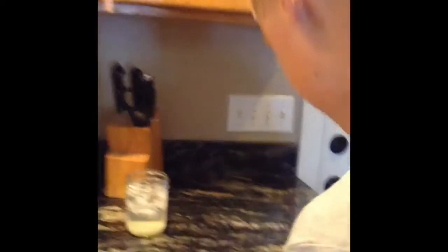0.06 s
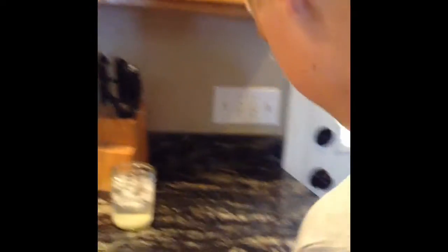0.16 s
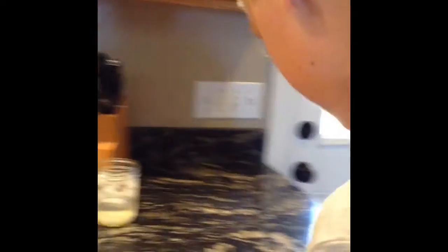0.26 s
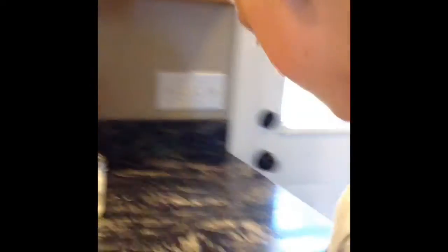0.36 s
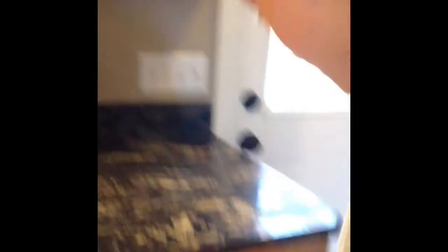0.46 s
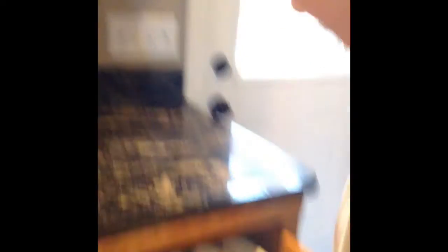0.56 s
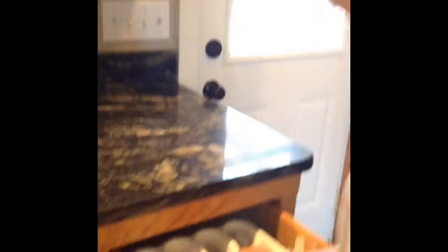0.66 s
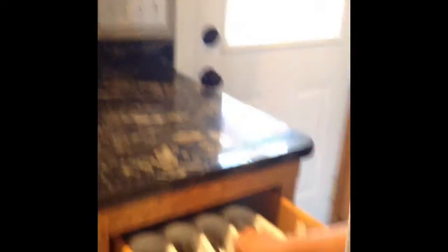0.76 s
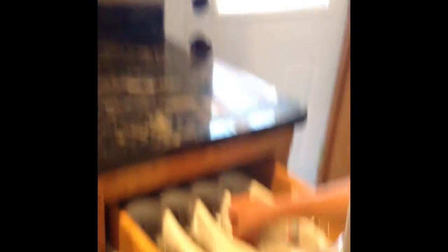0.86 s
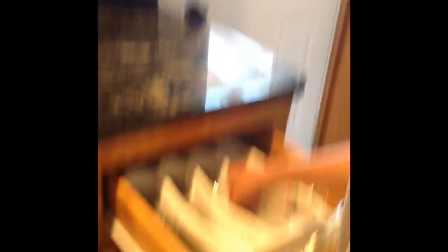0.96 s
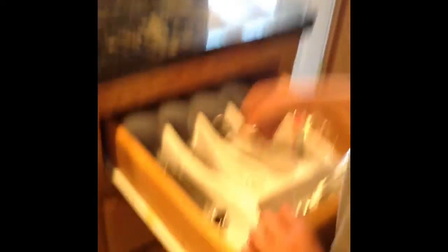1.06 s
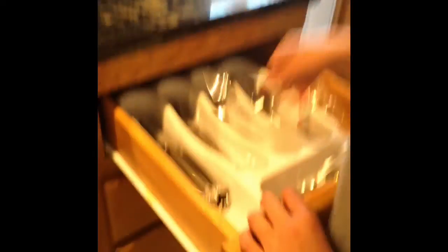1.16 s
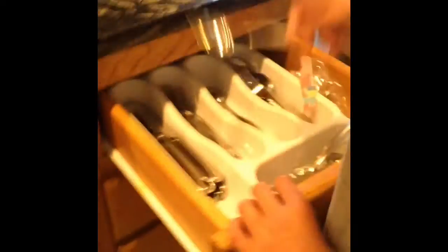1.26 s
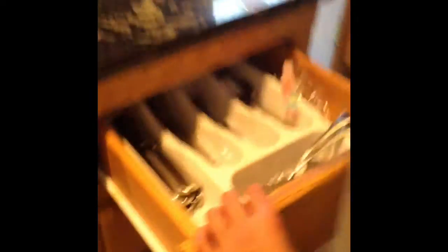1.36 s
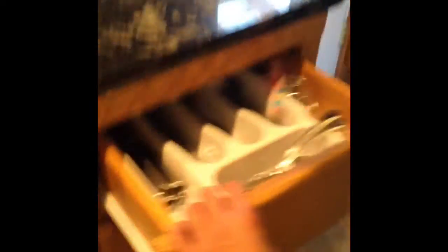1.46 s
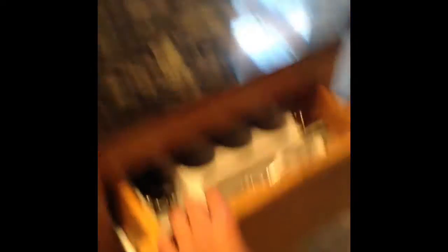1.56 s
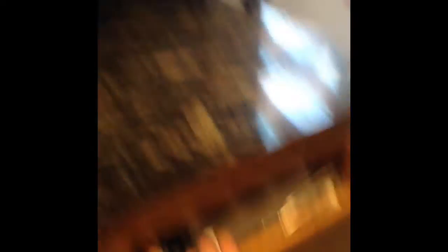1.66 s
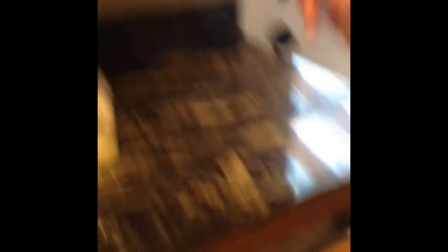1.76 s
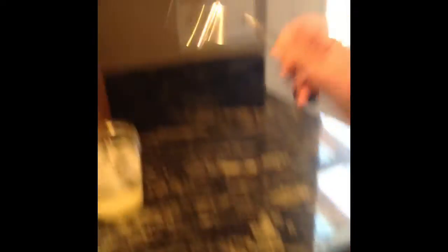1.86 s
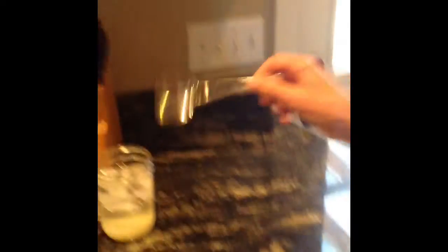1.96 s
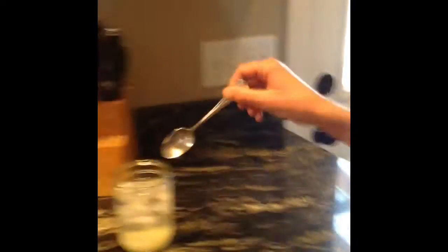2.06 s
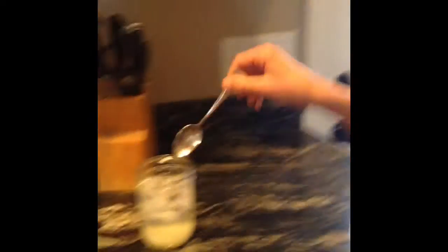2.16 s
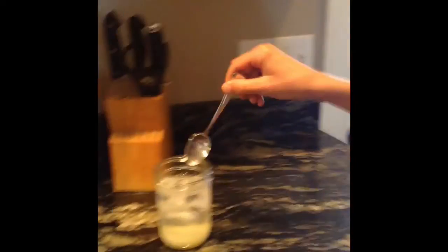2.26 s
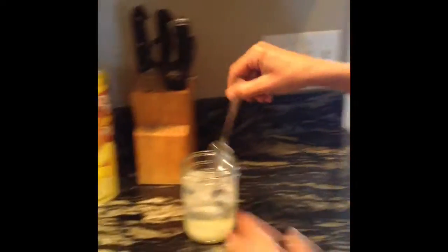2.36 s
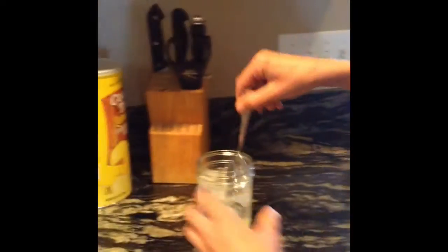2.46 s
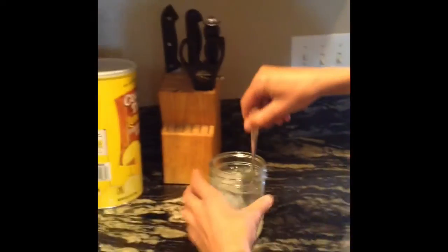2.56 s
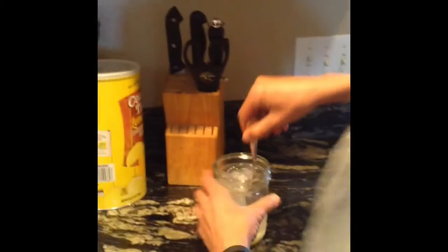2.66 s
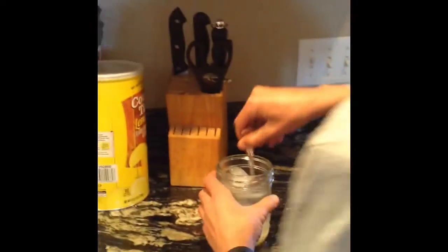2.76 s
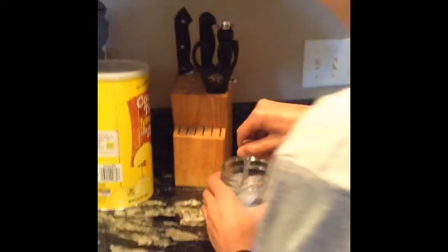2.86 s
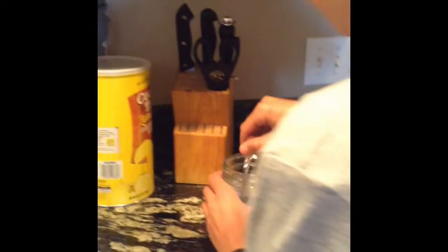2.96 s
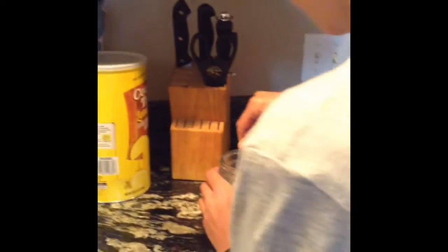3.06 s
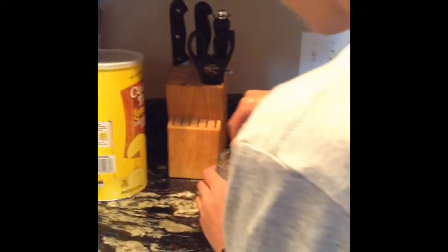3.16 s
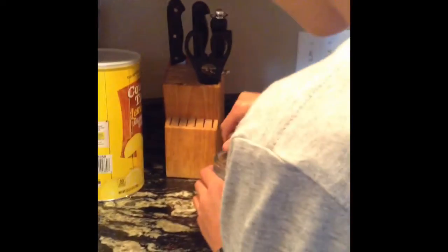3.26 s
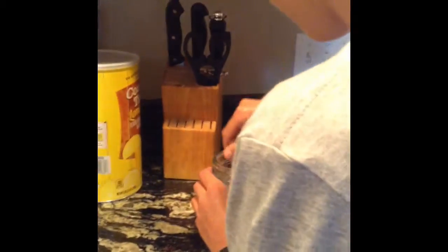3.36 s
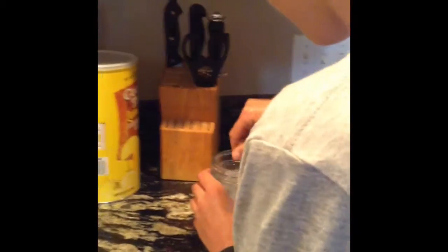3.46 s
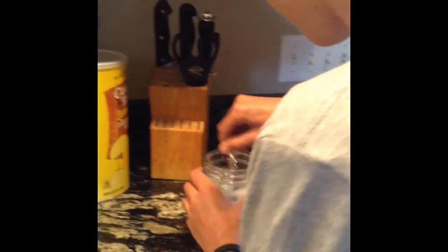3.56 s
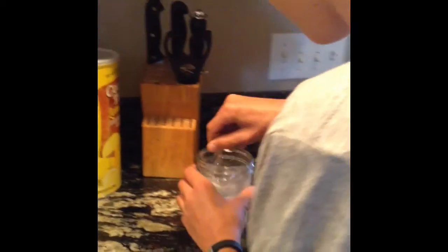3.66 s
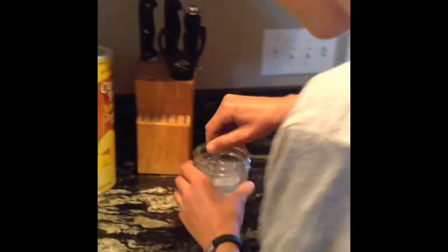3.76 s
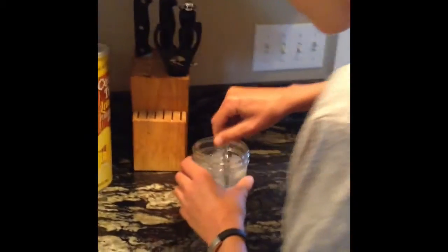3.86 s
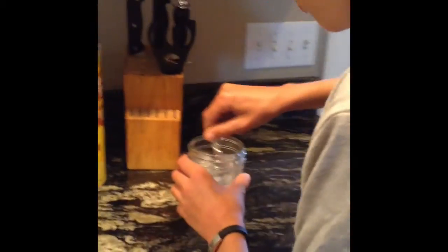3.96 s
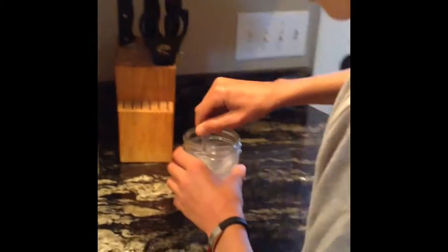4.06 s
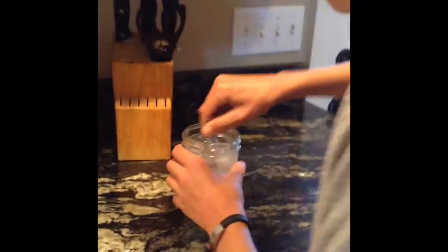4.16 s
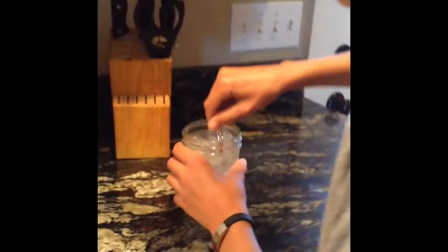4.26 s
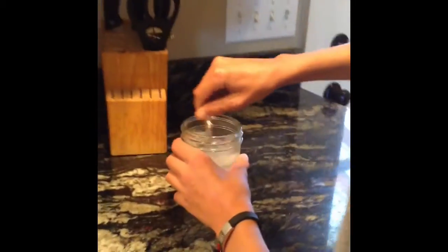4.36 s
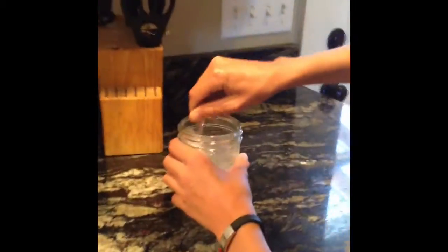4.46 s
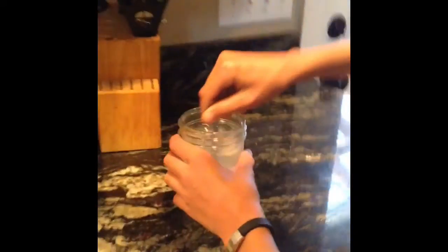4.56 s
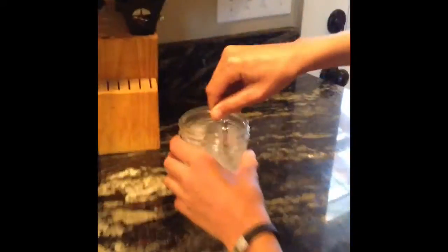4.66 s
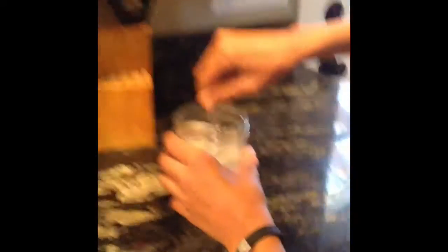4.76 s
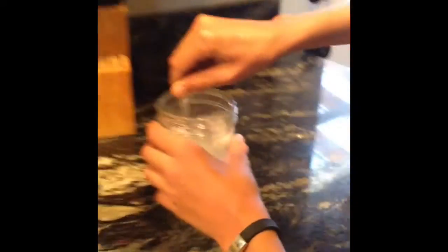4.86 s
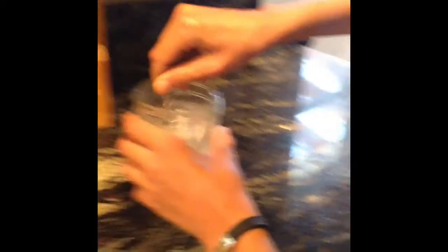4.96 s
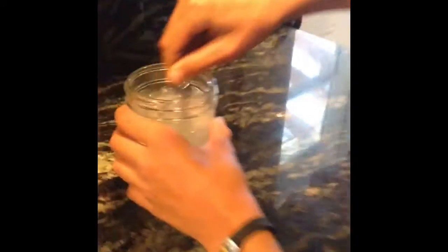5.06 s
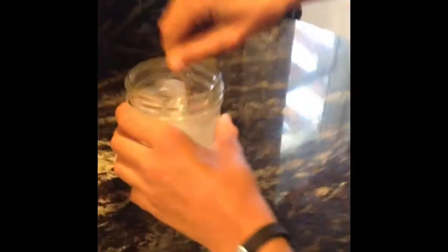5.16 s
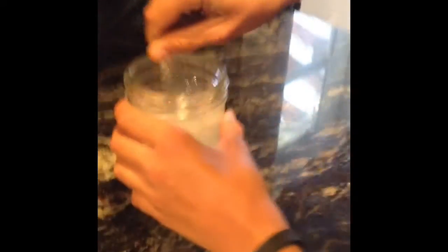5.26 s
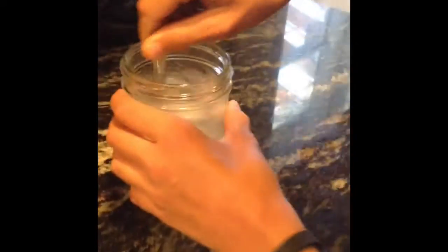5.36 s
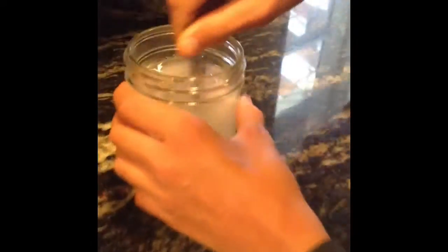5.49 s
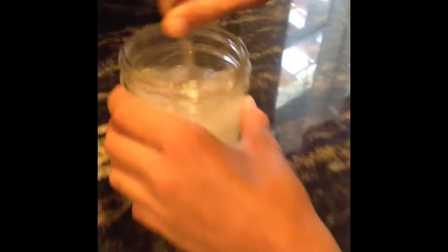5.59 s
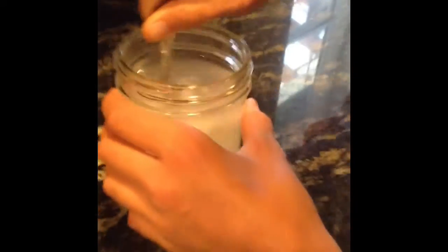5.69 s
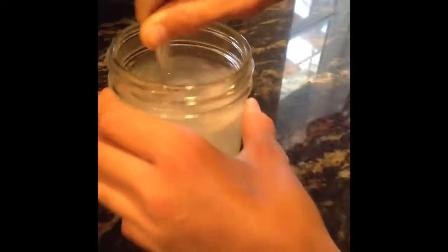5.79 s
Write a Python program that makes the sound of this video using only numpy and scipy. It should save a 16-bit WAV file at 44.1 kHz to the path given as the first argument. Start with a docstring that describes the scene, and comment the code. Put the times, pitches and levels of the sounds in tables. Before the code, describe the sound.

Close phone pickup in a reflective kitchen: brief drawer rolling, metallic tray rattle peaking in a hard ringing clack, a scraping roll back and a woody double-thud. After a short gap, a sharp ice crack begins the stirring: irregular glass ticks, crunchy ice chips, swishing water and tiny bubble gulps, getting drier, closer and busier towards the end.

```python
"""A spoon stirs a glass jar of ice water: struck wall modes clink, cubes grind, noise and bubbles slosh.
Before that a cutlery drawer rumbles open, the spoon is picked from the rattling tray and the drawer bangs shut:
coloured noise for the rolling, bursts of micro-impacts and decaying modes for the blows.
A phone close by hears it with the decaying noise tail of the small, hard kitchen."""
import sys
import numpy as np
from scipy import signal
from scipy.fft import rfft, irfft
from scipy.io import wavfile
from scipy.ndimage import uniform_filter1d

SR = 44100
rng = np.random.default_rng(int(sys.argv[2]) if len(sys.argv) > 2 else 0)


def store_wav(level_fs):
    """Save 16-bit WAV to argv[1]."""
    pcm = np.round(np.clip(np.atleast_2d(level_fs), -1, 1) * 32767)
    wavfile.write(sys.argv[1], SR, pcm.T.astype(np.int16))


N = 256970
T = np.arange(N) / SR
HIT_T = T[:SR // 2]

# blows on drawer and cabinet: (time [s], tray clack [dB], tray ring [dB], cabinet thud [dB],
# cutlery relative level [dB], clack decay [s])
KNOCKS = [(.303, -36.5, -54, -57, -41.5, 0.0086), (0.668, -35.5, -54, -59, -28, 0.027),
          (0.72, -38, -31.5, -39.5, -53, 0.011), (0.858, -34, -44, -42, -33.5, 0.015),
          (0.918, -26.5, -35, -32.5, -31.5, 0.048), (0.954, -31.5, -36, -46, -35.5, 0.038),
          (1.117, -22, -36, -37, -17.5, 0.018), (1.181, -7, -10.5, -35, -13, 0.0026),
          (1.192, -21, -22, -22.5, -23, 0.011), (1.2, -25, -30, -46, -21, 0.037),
          (1.558, -27.5, -44, -52, -32.5, 0.0061), (2.046, -14, -25, -15.5, -44, 0.0046),
          (2.0535, -30, -47, -18.5, -41, .008), (2.0609, -30, -29, -15.5, -27.5, 0.064),
          (2.069, -23.5, -45, -21, -28, 0.013), (2.408, -39, -57, -43, -48, 0.1)]
# cubes knock dully on the jar wall: (time [s], relative level [dB])
NUDGES = [(2.59, -34), (3.3604, -39.5), (3.6101, -36.5), (3.7944, -32), (3.65, -40.5), (3.901, -41),
          (4.0115, -37), (4.0496, -34.5), (4.2377, -43), (4.313, -34), (4.446, -43), (4.6344, -47),
          (4.82, -44), (5.0307, -35), (5.0666, -33), (5.0926, -34), (5.38, -34), (5.48, -31), (5.557, -37),
          (5.567, -31), (5.577, -39), (5.7108, -43)]
PIECE_SPREAD = 0.1  # cutlery pieces and cubes ring up to this share below nominal pitch


def undb(db):
    """Decibels to amplitude."""
    return 10 ** (np.asarray(db) / 20)


def unit(x):
    """Scale to rms 1."""
    return x / np.sqrt(np.mean(x ** 2) + 1e-20)


def crest(x, size=176):
    """Scale so that the loudest 4 ms have rms 1."""
    return x / np.sqrt(uniform_filter1d(x ** 2, size).max() + 1e-20)


def curves(rows):
    """Level columns as smoothed gains over time, near silence outside their span."""
    time_s, *columns = np.transpose(rows)
    levels_db = [np.interp(T, time_s, column, left=-120, right=-120) for column in columns]
    return [uniform_filter1d(undb(db), size=441) for db in levels_db]


def add(track, time_s, sound):
    """Mix a sound into the track at time_s."""
    i = max(int(time_s * SR), 0)
    track[i:i + len(sound)] += sound[:N - i]


def colour(x, points, size=4096):
    """Minimum-phase filter through (frequency [Hz], level [dB]) points."""
    hz, db = np.transpose(points)
    f = np.maximum(np.fft.rfftfreq(size, 1 / SR), 1)
    gain = undb(np.interp(np.log(f), np.log(hz), db))
    # fold the cepstrum to make the filter causal
    cepstrum = irfft(np.log(gain))
    cepstrum[1:size // 2] *= 2
    cepstrum[size // 2 + 1:] = 0
    impulse = irfft(np.exp(rfft(cepstrum)))
    return signal.fftconvolve(x, impulse)[:len(x)]


def wander(per_s):
    """Random curve with about per_s turns a second and a spread near 1."""
    return np.interp(T * per_s, np.arange(len(HIT_T)), rng.standard_normal(len(HIT_T)))


def grains(count, per_s, spread_db):
    """Random tiny impacts of uneven size and either sign."""
    size = undb(spread_db * np.minimum(rng.exponential(size=count), 3))
    return (rng.random(count) < per_s / SR) * size * rng.choice([-1, 1], count)


def chatter(decay_s, per_s):
    """A contact that breaks up into dying micro-bounces."""
    force = grains(len(HIT_T), per_s, 1.2)
    force[0] = 0.29
    return force * np.exp(-HIT_T / max(decay_s, 1e-4))


def ring(modes, pitch, scatter_db, sustain=1):
    """Free ring after a blow: decaying sines, their levels scattered as by the place of the blow."""
    hz, db, t60_s = np.transpose(modes)[:, :, None]
    size = undb(db + scatter_db * rng.standard_normal(hz.shape)) * rng.choice([-1, 1], hz.shape)
    decay = np.exp(-np.log(1000) * HIT_T / (t60_s * sustain))
    return np.sum(size * np.sin(2 * np.pi * hz * pitch * HIT_T) * decay, axis=0)


def blip(hz, cycles, glide=0.032, count=3000):
    """A short dying ring; a bubble's pitch rises by the share glide per decay time."""
    age = T[:count] * hz / cycles
    return np.sin(2 * np.pi * cycles * (age + glide * age ** 2 / 2)) * np.exp(-age)


def room_air():
    """Faint steady room noise, mostly low."""
    # spectrum: (frequency [Hz], relative level [dB])
    air_tone = [(60, 8.5), (110, -45), (165, 1.5), (260, -0.5), (400, -4), (800, -6), (2000, -14),
                (5000, -19), (15000, -19.5)]
    return undb(-54.0) * unit(colour(rng.standard_normal(N), air_tone))


def kitchen(x, wet_db, low_t60_s=0.51, high_t60_s=0.41, split_hz=2500):
    """Reflections as a decaying noise tail that starts after 3 ms; the treble dies faster."""
    low_pass = signal.butter(2, split_hz, fs=SR, output="sos")
    high_pass = signal.butter(2, split_hz, "high", fs=SR, output="sos")
    low = signal.sosfilt(low_pass, rng.standard_normal(len(HIT_T)))
    high = signal.sosfilt(high_pass, rng.standard_normal(len(HIT_T)))
    tail = low * np.exp(-np.log(1000) * HIT_T / low_t60_s)
    tail += high * np.exp(-np.log(1000) * HIT_T / high_t60_s)
    tail *= HIT_T > .003
    return x + signal.fftconvolve(undb(wet_db) * x, tail / np.linalg.norm(tail))[:N]


def drawer():
    """Rollers rumble with pitch set by speed, runners scrape; blows clack in the tray and thud in the cabinet."""
    # rolling: (time [s], rumble relative level [dB], scrape relative level [dB])
    roll_open = [(0.0, -34, -42.5), (0.14, -31, -49), (0.31, -41.5, -60), (0.36, -79, -78)]
    roll_shut = [(1.27, -38, -40), (1.36, -35, -37.5), (1.44, -33.5, -34), (1.5, -34.5, -38.5),
                 (1.55, -31.5, -39), (1.66, -32.5, -34), (1.73, -35.5, -45), (1.765, -28, -37),
                 (1.83, -39, -47), (1.9, -37.5, -46), (1.96, -42, -46), (2.021, -45, -37.5)]
    # roller speed: (time [s], rumble pitch factor)
    speed = [(0, 1.02), (.2, 1.03), (.26, 0.47), (1.27, 0.82), (1.55, 1.12), (1.75, .88), (1.9, 0.51),
             (2.02, 0.84)]
    # spectra: (frequency [Hz], relative level [dB]); rumble is at speed 1, tray clack before scatter
    rumble_tone = [(90, -38), (135, -1.5), (210, -3.5), (260, -1), (320, 2.5), (400, 7), (490, -10.5),
                   (700, -12), (1500, -35.5)]
    scrape_tone = [(300, -7), (550, 1), (780, 0), (1250, -4.5), (2000, -9), (3000, -14), (7000, -20),
                   (15000, -45)]
    clack_tone = [(70, -62.5), (150, -13.5), (260, -2), (360, -1.5), (560, -2.5), (700, -2.5), (810, 1),
                  (960, -1), (1150, -4.5), (1500, -5.5), (2200, -9.5), (3400, -10.5), (5000, -15.5),
                  (8000, -27), (15000, -73)]
    # modes: (nominal frequency [Hz], relative level [dB], t60 [s])
    tray_modes = [(576, -14, 0.044), (752, -1.5, 0.097), (870, 1, 0.067), (1006, -1, 0.021),
                  (1440, -2.5, 0.066)]
    cabinet_modes = [(131, -7, .11), (250, -10, .04), (323, 1, .065), (380, 2, .065), (440, -2, .045),
                     (950, -1, .045)]
    bumps_per_s, bump_db = 32, 3.5
    judder_per_s, judder_db = 46, 1.5  # the runners catch and slip
    scatter_db = 2.2
    tray_spread, cabinet_spread = 0.013, 0.035  # pitch scatter per blow

    out = np.zeros(N)
    travel = np.cumsum(np.interp(T, *np.transpose(speed))) / SR
    for rows in (roll_open, roll_shut):
        rumble_gain, scrape_gain = curves(rows)
        bumps = grains(N, 500, 2.6) * undb(bump_db * wander(bumps_per_s))
        rumble = np.interp(travel, T, unit(colour(bumps, rumble_tone)))
        out += undb(-7.5) * rumble_gain * rumble
        judder = grains(N, 700, 0.59) * undb(judder_db * wander(judder_per_s))
        out += undb(-4.5) * scrape_gain * unit(colour(judder, scrape_tone))
    for time_s, clack_db, ring_db, thud_db, _, decay_s in KNOCKS:
        tone = np.array(clack_tone) + np.outer(rng.standard_normal(len(clack_tone)), [0, scatter_db])
        add(out, time_s, undb(clack_db) * crest(colour(chatter(decay_s, 4000), tone)))
        tray_pitch = 1 + tray_spread * rng.standard_normal()
        add(out, time_s, undb(ring_db) * crest(ring(tray_modes, tray_pitch, scatter_db)))
        cabinet_pitch = 1 + cabinet_spread * rng.standard_normal()
        add(out, time_s, undb(thud_db) * crest(ring(cabinet_modes, cabinet_pitch, scatter_db)))
    return out


def cutlery(jangle_db=-4, pile_t60_s=0.04, piece_db=-3, scatter_db=3):
    """Steel pieces bounce and blur into a jangle, from which one piece rings out; the spoon rings clear."""
    # loose pieces fall back into the tray: (time [s], relative level [dB], rattle decay [s])
    jingles = [(1.362, -37, 0.017), (1.629, -33, 0.0069), (1.964, -44.5, 0.02), (2.084, -22.5, 0.038)]
    # the spoon rings free as it is touched and lifted: (time [s], level [dB], pitch factor)
    pings = [(.672, -29, 1.175), (.965, -41, 1.03), (1.1175, -13, 1), (1.191, -22, 1)]
    # spoon modes: (nominal frequency [Hz], relative level [dB], t60 [s])
    spoon_modes = [(4904, -7, .11), (6325, 3, .09), (6845, 2, .1), (7084, -8, .14), (7430, -10, .16),
                   (8340, -6, .1), (8823, -3, .13), (10000, -4, .05), (10780, -11, .16), (11040, -4, .12),
                   (11690, -8, .13), (11890, -8, .11), (12670, 1, .11), (13262, 1, .13), (13460, -1, .13)]
    # (frequency [Hz], relative level [dB])
    steel_tone = [(300, -3), (900, 12.5), (2500, 17.5), (3400, 16), (5000, 16), (7000, 18.5), (13000, 20),
                  (15500, 15.5)]
    rattle_share = 0.87  # rattle decay over clack decay

    out = np.zeros(N)
    shaken = [(time_s, db, rattle_share * decay_s) for time_s, _, _, _, db, decay_s in KNOCKS]
    pile_pole = np.exp(-2 * np.log(1000) / (pile_t60_s * SR))
    for time_s, db, decay_s in shaken + list(jingles):
        bounces = chatter(decay_s, 1800)
        # so many modes ring in the pile that only its dying energy is heard
        energy = signal.lfilter([1], [1, -pile_pole], bounces ** 2)
        jangle = np.sqrt(energy) * rng.standard_normal(len(energy))
        rattle = crest(bounces) + undb(jangle_db) * crest(jangle)
        add(out, time_s, undb(db) * crest(colour(rattle, steel_tone)))
        piece = ring(spoon_modes, 1 - PIECE_SPREAD * rng.random(), scatter_db)
        add(out, time_s, undb(db + piece_db) * crest(piece))
    for time_s, db, pitch in pings:
        add(out, time_s, undb(db) * crest(ring(spoon_modes, pitch, scatter_db)))
    return out


def jar_shift():
    """The jar shifts on the counter: low-coloured grains under a brief swell."""
    # (time [s], level [dB])
    shift_level = [(2.92, -67), (2.95, -45), (3.02, -57), (3.07, -83)]
    # (frequency [Hz], relative level [dB])
    counter_tone = [(100, -17), (150, 4), (230, -7), (330, -27), (700, -42)]
    return curves(shift_level)[0] * unit(colour(grains(N, 660, 1.5), counter_tone))


def driven(law):
    """Gain of one part of the stirring: it follows the hand's effort and surges at random."""
    # (time [s], effort [dB])
    effort_points = [(2.48, -35), (2.63, -34.5), (2.72, -37.5), (2.83, -31.5), (2.96, -37), (3.13, -33.5),
                     (3.4, -38), (3.57, -46), (3.67, -40.5), (3.82, -41.5), (3.98, -44.5), (4.22, -36.5),
                     (4.35, -38.5), (4.62, -43), (4.77, -34), (4.96, -41), (5.22, -39.5), (5.37, -38.5),
                     (5.49, -36), (5.65, -36), (5.83, -51)]
    usual_effort_db = -40
    surge_per_s, surge_db = 18, 2.2
    usual_db, slope = law
    effort_db = np.interp(T, *np.transpose(effort_points), left=-160)
    return undb(usual_db + slope * (effort_db - usual_effort_db) + surge_db * wander(surge_per_s))


def water(slosh, splash_db=-2, bubbles_db=-4.5, count=600):
    """Splashes and small bubbles, coloured by the air in the jar's neck; air pockets collapse with a gulp."""
    # (frequency [Hz], relative level [dB])
    neck_tone = [(70, -12), (160, -40), (320, -1), (550, -10), (780, 4), (980, 3.5), (1200, -8), (2000, 2),
                 (3500, -15.5)]
    # air pockets behind the spoon:
    # (time [s], frequency [Hz], peak level [dB], decay [s], pitch rise per decay [share])
    pockets = [(2.838, 1272, -34.5, 0.025, 0.066), (2.892, 1490, -36, 0.018, 0.076),
               (2.914, 1860, -34.5, 0.0099, 0.047), (3.268, 1900, -29, 0.012, 0.0028),
               (3.806, 842, -37, 0.01, .01), (4.452, 706, -31.5, 0.021, 0.067),
               (4.775, 915, -31.5, 0.022, 0.016), (5.139, 652, -34.5, 0.012, 0.36),
               (5.154, 916, -30.5, 0.011, 0.014), (5.258, 1960, -28, 0.0042, 0.11),
               (5.435, 775, -33, 0.0064, 0.092), (5.599, 1890, -31.5, .009, 0.044),
               (5.692, 768, -36, 0.015, 0.023)]
    gulp_db, gulp_s = -10, 0.016  # splash around each pocket: level re its bubble, decay

    fizz = np.zeros(N)
    for when, octave, size in rng.random((count, 3)):
        add(fizz, when * T[-1], undb(10 * size) * blip(600 * 2 ** (1.9 * octave), cycles=5))
    splash = unit(colour(grains(N, 500, 3.6), neck_tone))
    out = slosh * (undb(splash_db) * splash + undb(bubbles_db) * unit(colour(fizz, neck_tone)))
    for time_s, hz, db, decay_s, rise in pockets:
        add(out, time_s, undb(db) * blip(hz, hz * decay_s, rise, count=5000))
        add(out, time_s, undb(db + gulp_db) * crest(colour(chatter(gulp_s, 2000), neck_tone)))
    return out


def cubes(count=3000, order=6, cycles=7, cluster_s=0.009):
    """Ice chips grind in dense clusters of order contacts; each contact has a brief pitch of its own."""
    out = np.zeros(N)
    for when, force in rng.random((count // order, 2)):
        size = undb(-4.6 * np.log(force + .06))
        for lag, octave in rng.random((order, 2)):
            hz = 2400 * 5.5 ** octave
            time_s = min(when * T[-1] + cluster_s * lag, T[-1])
            add(out, time_s, size * blip(hz, cycles, glide=0, count=700))
    return out


def ice(grit, contacts, contact_db=-1, grit_db=-11.0, cubes_db=-1, scatter_db=2.0):
    """Hard contacts: spoon and cubes tick on the glass, the spoon cracks into cubes, cubes grind and tinkle."""
    # (frequency [Hz], relative level before scatter [dB])
    glass_tone = [(130, -72), (360, -5), (850, 1.5), (2300, -8), (3200, 6.5), (3750, 1.5), (4250, 11),
                  (4600, 5.5), (5350, 13.5), (6300, -2), (7700, 8), (9200, -2), (11000, 0.5), (15500, -13)]
    # spoon cracking into a cube: (time [s], level [dB], pitch factor, ring time factor)
    cracks = [(2.4753, -7.5, 1.02, 0.79), (2.5404, -25.5, 1.03, 3.2), (2.613, -29.5, 1.02, 2.1),
              (4.733, -23.5, .88, 1.6), (5.654, -17.5, 1.26, 0.57)]
    # (nominal frequency [Hz], relative level [dB], nominal t60 [s])
    cube_modes = [(4300, -7, .018), (4670, -5, .014), (5620, 0, .022), (6200, -3, .016), (7540, -4, .011),
                  (8210, -1, .013), (10000, -10, .012), (12700, -13, .015)]
    catch_per_s, catch_db = 55, 4  # the cubes catch and slip
    bright_above_hz = 3200  # a contact's brightness tilts the treble above this
    tone_scatter_db, nudge_cube_db = 5.2, -3

    grit = grit * undb(catch_db * wander(catch_per_s))
    out = undb(grit_db) * grit * unit(colour(grains(N, 260, 5.5), glass_tone))
    out += undb(cubes_db) * grit * unit(colour(cubes(), glass_tone))
    hz, glass_db = np.transpose(glass_tone)
    octaves = np.maximum(np.log2(hz / bright_above_hz), 0)
    for time_s, db, _, _, decay_s, bright in contacts:
        # every contact point has its own tone colour
        tone_db = glass_db + bright * octaves + tone_scatter_db * rng.standard_normal(len(hz))
        tick = colour(chatter(decay_s, 3000)[:SR // 8], np.column_stack([hz, tone_db]))
        add(out, time_s, undb(db + contact_db) * crest(tick))
    for time_s, db, pitch, sustain in cracks:
        add(out, time_s, undb(db) * crest(ring(cube_modes, pitch, scatter_db, sustain)))
    for time_s, db in NUDGES:
        # each knock has a pitch of its own, as from cubes of different size
        cube = ring(cube_modes, 1 - PIECE_SPREAD * rng.random(), scatter_db)
        add(out, time_s, undb(db + nudge_cube_db) * crest(cube))
    return out


def nudges():
    """The cubes' knocks as rows like the spoon's blows, all equally dull."""
    ring_db, decay_s, bright_db_per_octave = -3.5, 0.009, -6.5  # ring is re the contact
    return [(time_s, db, db + ring_db, db + ring_db, decay_s, bright_db_per_octave) for time_s, db in NUDGES]


def jar(rubbing, contacts, low_db=-3, upper_db=2, waver=0.0055, waver_per_s=35, twin_db=-10):
    """Blows and jostling cubes ring the glass, whose paired modes beat and waver with the water."""
    # wall modes: (nominal frequency [Hz], struck relative level [dB], rubbed relative level [dB], t60 [s])
    wall_modes = [(1502.3, -1.5, -6.5, 0.11), (3116, -2.5, -13.5, 0.12), (3120, -43, -10.5, 0.11),
                  (4050, -18, -33, 0.12), (4870, -18.5, -14.5, 0.075), (5400, -18.5, -22, 0.12),
                  (5240, -52, -49, 0.056), (7500, -19.5, -36, 0.091)]
    # the swirling water loads the wall: (time [s], pitch factor before waver)
    load = [(2.45, 1.02), (2.85, 1.04), (3.1, 1.04), (3.5, 1.012), (4.0, 1.028), (4.5, 1.012), (4.8, 1.0),
            (5.2, 1.032), (5.5, 1.024), (5.83, 1.026)]
    # the jar is not quite round: each mode has a weaker twin, alternately this share above and below
    twin_split = 0.0086

    out = np.zeros(N)
    turns = np.cumsum(np.interp(T, *np.transpose(load)) + waver * wander(waver_per_s)) / SR
    time_s, _, lowest, upper, _, _ = np.transpose(contacts)
    jostle = grains(N, 230, 2.5)
    for k, (hz, struck_db, rubbed_db, t60_s) in enumerate(wall_modes):
        pole = np.exp(-np.log(1000) / (t60_s * SR))
        blow_db = upper + upper_db if k else lowest + low_db
        for pitch, share_db in ((1, 0), (1 + twin_split * (-1) ** k, twin_db)):
            spin = np.exp(2j * np.pi * hz * pitch * turns)
            blows = np.zeros(N)
            blows[(time_s * SR).astype(int)] = undb(struck_db + share_db + blow_db)
            # random weights: each cube meets the wall at another place
            rubs = unit(jostle * rng.standard_normal(N)) * np.sqrt(1 - pole ** 2)
            force = blows + rubs * rubbing * undb(rubbed_db)
            # resonate at 0 Hz, then shift to the moving pitch
            out += np.imag(spin * signal.lfilter([1], [1, -pole], force * spin.conj()))
    # a small jar radiates little bass
    return signal.sosfilt(signal.butter(2, 700, "high", fs=SR, output="sos"), out)


def stirring():
    """The spoon's blows and the stirring effort drive jar wall, ice and water."""
    # hard blows of the spoon on the jar: (time [s], contact relative level [dB], lowest wall mode
    # relative level [dB], upper wall modes relative level [dB], bounce decay [s], brightness [dB/octave])
    clinks = [(2.4755, -15, -26.5, -50, 0.0043, 2), (2.498, -31, -56, -48, 0.01, 0),
              (2.5422, -23, -54, -51, 0.007, -1.5), (2.6101, -31, -41, -46, 0.0092, -4),
              (2.7478, -29.5, -27, -47, 0.0023, 5.5), (2.8228, -24, -27, -33, 0.006, 2),
              (2.9284, -37.5, -37, -30.5, 0.016, 17), (3.0511, -25.5, -55, -26, 0.007, 0),
              (3.068, -31, -29, -48, 0.0065, 2), (3.096, -21.5, -34, -50, 0.0032, 0),
              (3.135, -29.5, -36, -35, 0.011, -1), (3.2, -30, -32, -33, 0.0089, 5),
              (3.2686, -43, -24, -52, 0.0026, -7), (3.8622, -31, -49, -43, .006, -1),
              (3.9693, -42, -30, -34, 0.0046, 4), (4.0912, -27, -34, -31.5, 0.005, 1),
              (4.173, -28.5, -50, -53, 0.0041, 2.5), (4.3372, -27, -39, -28, 0.0098, 0.5),
              (4.6539, -28, -32, -55, 0.021, 2.5), (4.6857, -40, -31, -47, 0.0071, -8),
              (4.7073, -27.5, -46, -50, 0.027, -11), (4.743, -10.5, -16, -21, 0.0027, -3.5),
              (4.7505, -16.5, -42, -21, 0.0096, -2), (4.792, -37, -49, -26.5, 0.0059, 2),
              (4.8864, -23, -48, -33, 0.0082, -1), (4.992, -34, -56, -53, 0.0067, 3),
              (5.042, -29, -39, -29.5, 0.01, -5), (5.1174, -33, -45, -30, 0.009, 1),
              (5.137, -31, -29, -29, .005, 0), (5.1683, -26, -39, -30, 0.01, 1.5),
              (5.1875, -22, -26.5, -34, 0.013, 0), (5.2027, -20.5, -33, -18, 0.0073, 0.5),
              (5.2566, -29, -51, -51, 0.01, -3), (5.289, -24.5, -59, -28, 0.0077, -7),
              (5.3523, -36, -31, -46, 0.0028, 1), (5.4332, -28.5, -33, -35, 0.014, 0),
              (5.4631, -23, -33, -25, 0.012, -3), (5.484, -29.5, -36, -22.5, 0.018, 8),
              (5.496, -20, -24, -29, 0.0054, 1.5), (5.505, -16, -31, -35, .003, 3),
              (5.5973, -38, -35, -27.5, 0.0048, 3), (5.6552, -16, -22, -10, .005, -0.5),
              (5.662, -21, -42, -9.5, .005, -9), (5.7824, -28.5, -28, -37, 0.012, -0.5)]
    # how each part follows the effort: (relative level at usual effort [dB], slope [dB/dB])
    rubbing_law = (-40.5, 0.86)
    grit_law = (-45.5, 1.25)
    slosh_law = (-50, 0.74)
    contacts = np.vstack([clinks, nudges()])
    out = jar(driven(rubbing_law), contacts)
    out += ice(driven(grit_law), contacts)
    out += water(driven(slosh_law))
    return out + jar_shift()


def scene():
    """Drawer and jar sound in the same kitchen, over faint room air."""
    # room share around the jar swells until 3.2 s, then the sound gets drier and closer:
    # (time [s], room share [dB])
    room_share = [(2.5, -6), (3.2, -0.5), (4.6, -5), (5.6, -7.5)]
    drawer_part = kitchen(drawer() + cutlery(), wet_db=-5.0)
    jar_part = kitchen(stirring(), wet_db=np.interp(T, *np.transpose(room_share)))
    return (drawer_part + jar_part + room_air())[None]


def record(dry):
    """Drop the deep bass, clip at full scale and low-pass the top."""
    bass_cut_hz, top_hz = 122, 15200
    thin = signal.sosfilt(signal.butter(6, bass_cut_hz, "high", fs=SR, output="sos"), dry)
    top_cut = signal.ellip(8, .2, 70, top_hz, fs=SR, output="sos")
    return signal.sosfilt(top_cut, np.clip(thin, -1, 1))


dry = scene()
out = record(dry)
store_wav(out)
```